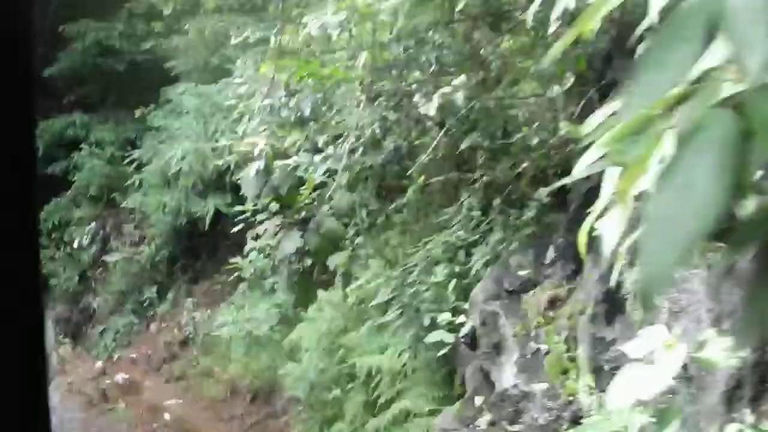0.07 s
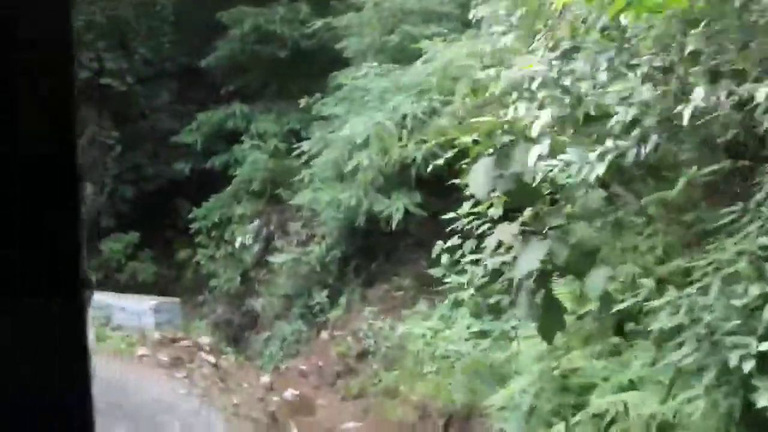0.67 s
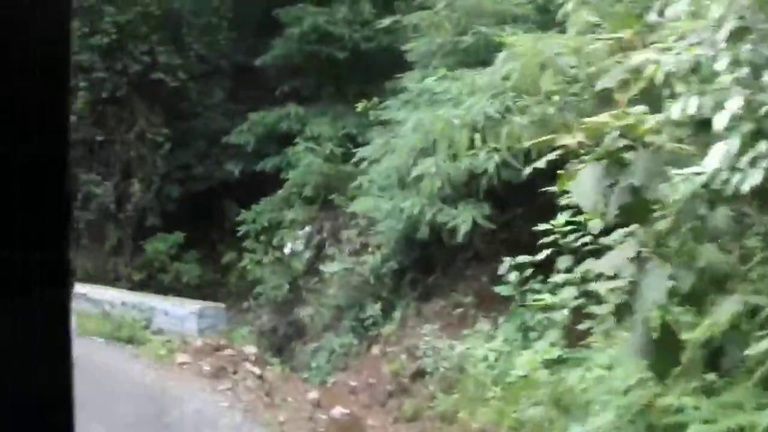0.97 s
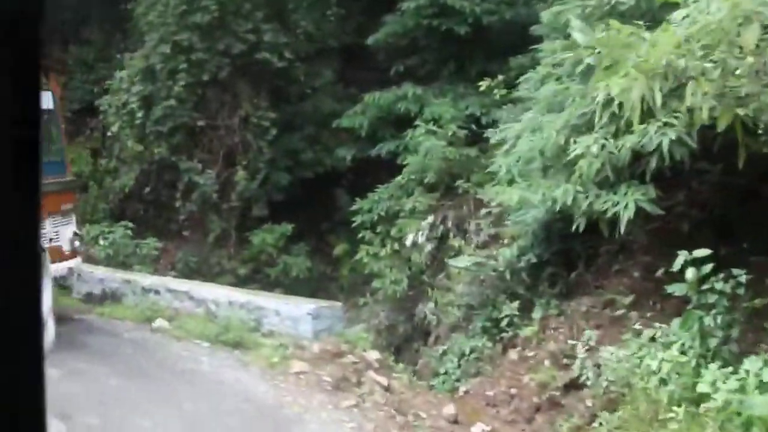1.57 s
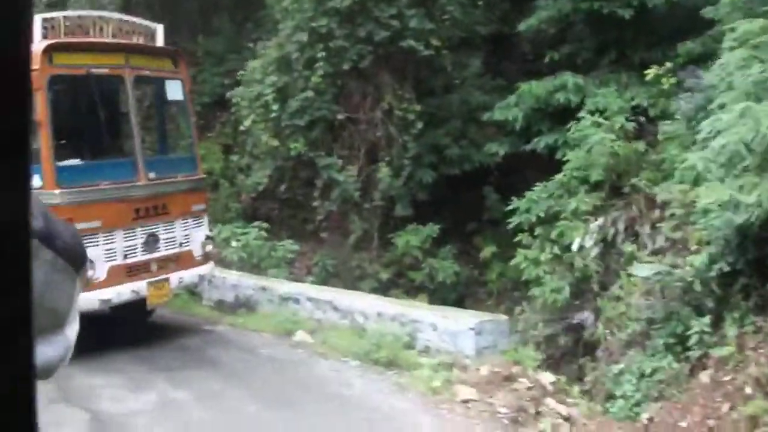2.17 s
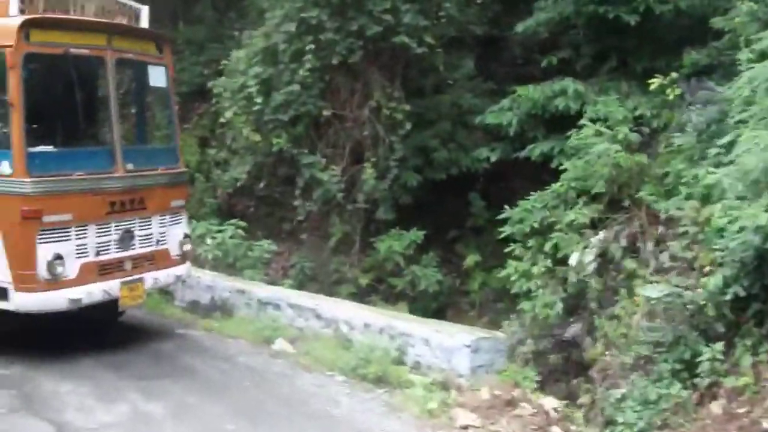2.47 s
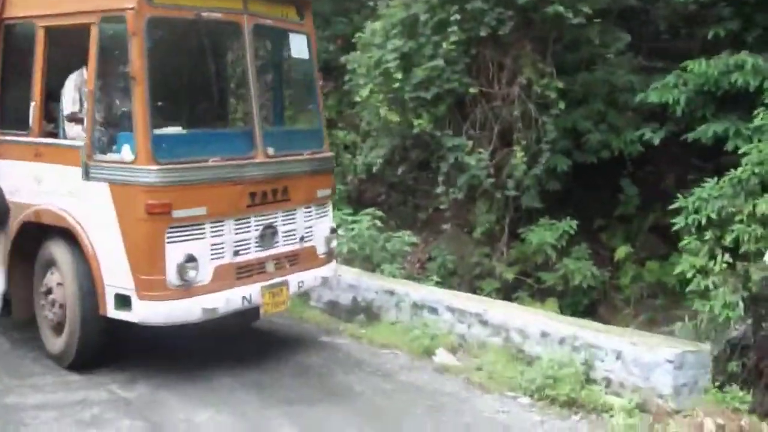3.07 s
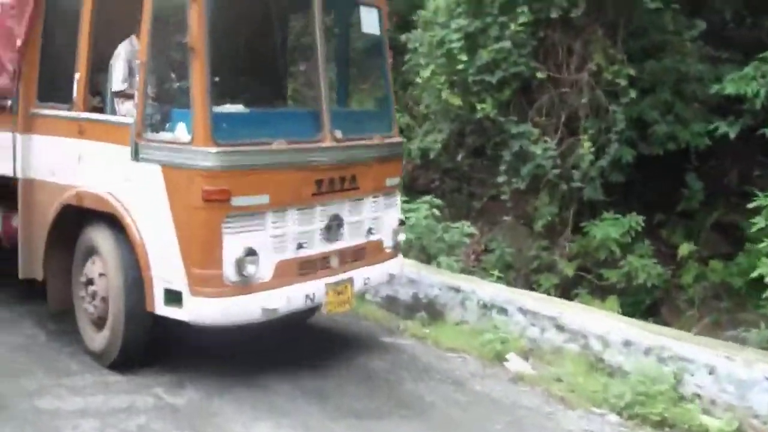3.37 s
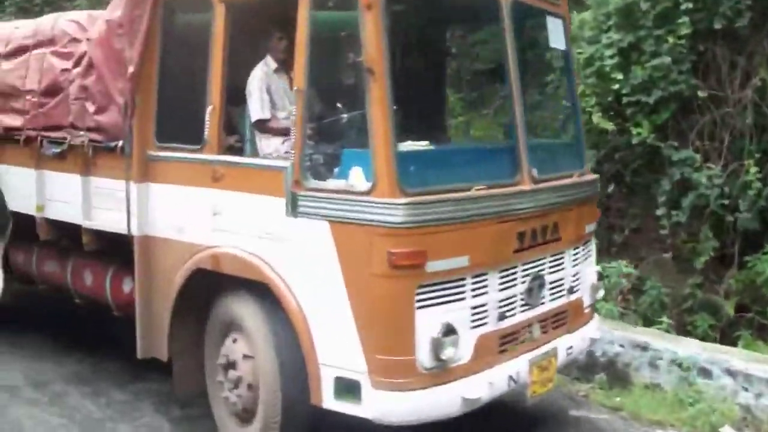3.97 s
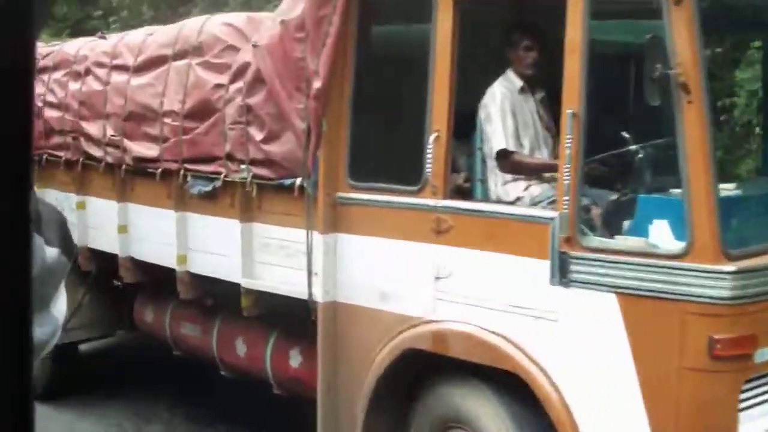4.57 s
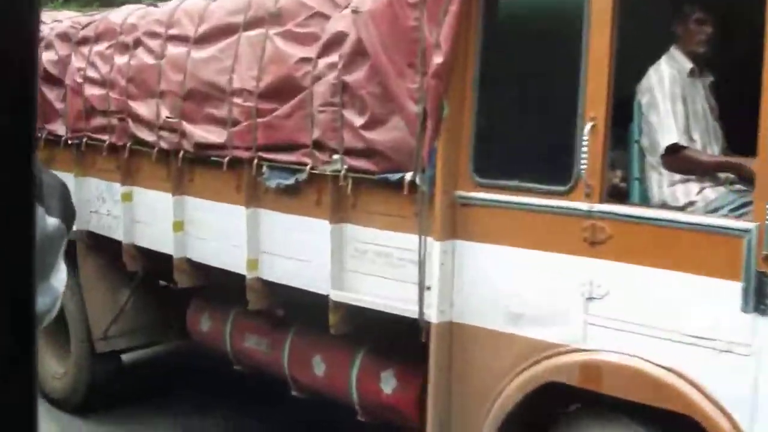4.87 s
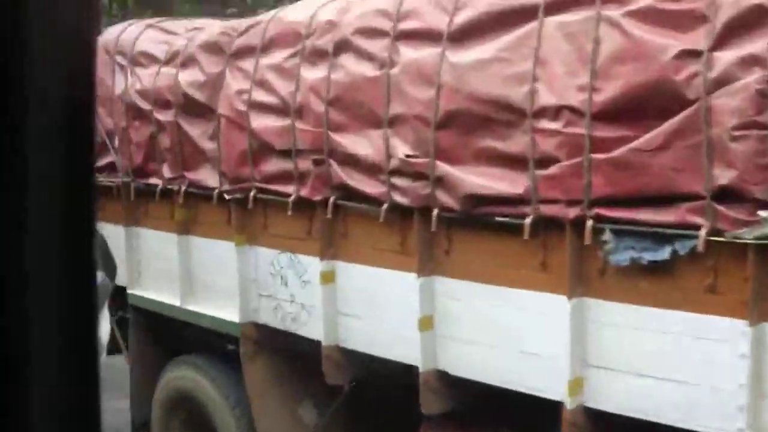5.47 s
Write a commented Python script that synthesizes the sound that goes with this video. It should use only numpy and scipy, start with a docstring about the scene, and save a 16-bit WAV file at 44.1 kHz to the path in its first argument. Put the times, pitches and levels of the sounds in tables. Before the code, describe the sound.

A diesel truck rumbles closer, brakes squeaking faintly, then gives a sharp air brake hiss, revs up and passes close by.

```python
"""A laden six-cylinder diesel truck creeps round a mountain bend and passes close to a waiting vehicle.
Heard from that vehicle's open window, each firing booms in the exhaust and clatters in the block,
over a low rumble and a growing hiss. Brake linings squeak, bodywork scuffs, a loose panel knocks
and a small plastic housing clicks close by. The air brake vents a jet that echoes off the hillside,
then the engine revs up and the truck goes by."""
import sys
import numpy as np
from scipy import signal
from scipy.fft import rfft, irfft
from scipy.io import wavfile
from scipy.ndimage import uniform_filter1d

SR = 44100
rng = np.random.default_rng(int(sys.argv[2]) if len(sys.argv) > 2 else 0)


def file_out(sig):
    """Save sig as 16-bit WAV at sys.argv[1]."""
    # one column per channel
    cols = np.atleast_2d(sig).T
    # limit, then scale
    lim = np.clip(cols, -1, 1)
    pcm = np.round(lim * 32767).astype(np.int16)
    wavfile.write(sys.argv[1], SR, pcm)


N = 242991
T = np.arange(N) / SR

# dabs of throttle: start_s, length_s, firing_from_hz, firing_to_hz, boom_db
THROTTLE_DABS = [(0.768, .35, 32.96, 49.97, -7.5), (3.828, .22, 43.88, 52.04, -18)]
# pulling away: time_s, firing_hz, boom_db
PULL_AWAY = [(4.45, 45.36, -14.5), (4.6, 58.46, -16.5), (4.612, 60.1, -12.5), (4.706, 67.5, -4),
             (4.866, 81.2, -7.5), (4.948, 85.7, -9), (5.074, 86.93, -13), (5.486, 76.65, -8.5),
             (5.51, 77.3, -12)]
# exhaust harmonics at the highest revs: crankshaft_multiple, gain_db
EXHAUST_ORDERS = [(1, -17), (2, -18), (3, 0), (4, -19), (5, -21), (6, -15.3), (7, -23), (9, -26), (11, -27),
                  (19, -30), (21, -27)]
# openings in the truck's side going by: centre_s, half_length_s, gain_db
SIDE_OPENINGS = [(3.448, 0.093, 1.5), (4.86, .11, 1), (5.45, .12, 2)]
# jolts of the waiting vehicle: centre_s, half_length_s, rush_db, sway_db
JOLTS = [(0.283, 0.16, -31, -28), (0.85, 0.17, -28.5, -23), (1.339, 0.076, -35.5, -12),
         (1.465, 0.08, -28, -17), (1.975, 0.094, -33.5, -17), (2.673, 0.096, -43, -18),
         (3.157, 0.033, -28, -24), (3.547, .14, -36, -18), (3.91, 0.062, -30, -29),
         (4.256, 0.09, -32, -18.5), (4.5, 0.069, -27, -14.5), (5.124, 0.04, -43, -9)]
# brake squeaks: start_s, length_s, start_pitch_hz, end_pitch_hz, level_db
SQUEAKS = [(-.03, .09, 8680, 8720, -40), (.14, .135, 3920, 4150, -35.5), (.2, .1, 8750, 8980, -45),
           (.57, .1, 10120, 10070, -43), (.62, .38, 5790, 5775, -38.5), (.715, .08, 11330, 11100, -49),
           (1.19, .09, 8720, 8680, -39)]
# bodywork scuffs: start_s, length_s, level_db
SCUFFS = [(0.157, 0.29, -35), (.565, 0.16, -32)]
# clicks on the housing: start_s, impulse_db
CLICKS = [(3.1265, -6.5), (3.1424, -12.5), (3.1722, 4.5)]

# spectral envelopes of the sources: frequency_hz, gain_db
BLOCK_SPECTRUM = [(110, -6), (170, 1.5), (220, -6), (310, -4.5), (410, -12.5), (520, -4.5), (650, -6),
                  (800, -7.5), (1100, -8.5), (2000, -17), (2950, -19.5), (3300, -37), (5400, -33.5),
                  (7150, -24.5), (10000, -40), (15000, -70)]
SHUDDER_SPECTRUM = [(12, -10), (20, -7), (28, -1), (36, -6.5), (48, -15.5), (70, -15.5), (100, -19),
                    (150, -28.5)]
BODY_SPECTRUM = [(60, -4), (110, -2), (170, 2.5), (230, 0), (310, -2), (400, -6.5), (520, -3), (800, -16),
                 (1200, -9.5), (1700, -23.5), (2200, -18.5), (5000, -41)]
RUSH_SPECTRUM = [(130, -4.5), (250, -2), (400, -1.5), (520, 2), (700, -9), (1000, -7.5), (1500, -14.5),
                 (2500, -22), (5000, -30)]
SWAY_SPECTRUM = [(14, -9), (28, 0), (38, -8), (55, -20)]
HISS_SPECTRUM = [(800, -6), (1500, -0.5), (2600, -3), (3500, -2), (4500, 0), (5400, -3.5), (6300, 0.5),
                 (7200, 2.5), (8000, -6), (9000, -8.5), (10200, -15.5), (12500, -17.5), (15000, -15)]
SCUFF_SPECTRUM = [(300, 5), (1000, -2), (2000, -11), (3600, -2), (5200, -14), (8000, -7), (11000, -27),
                  (14000, -36)]
JET_SPECTRUM = [(500, -8), (700, 5), (950, -2), (1400, 4), (1720, -9), (2050, 4.5), (2750, 0), (3020, -9),
                (3350, -0.5), (4400, 2), (5400, -4.5), (7150, -4.5), (8200, -11.5), (10000, -16),
                (13500, -21), (15500, -24)]
HOUSING_SPECTRUM = [(300, 0), (8800, 0), (11000, -12), (15000, -22)]
PIPE_FLOW_SPECTRUM = [(400, 6.5), (7000, -2), (9000, -11)]
SIZZLE_SPECTRUM = [(6000, -8), (7000, 6), (8500, -2.5), (11000, -6.5), (13500, -5), (15500, -14)]
STEREO_HISS_SPECTRUM = [(2500, -6), (7200, 0), (10000, -13), (15000, -24)]

# resonances of the ringing parts: pitch_hz, bandwidth_hz, gain_db
TRUCK_PANEL_MODES = [(526, 60, -1), (623, 74, 3), (688, 56, -4), (881, 58, -1), (1034, 88, -6.5),
                     (1254, 47, -11), (2902, 96, -10), (4050, 71, -25), (4460, 120, -25)]
ENGINE_FRONT_MODES = [(2900, 110, 0)]
LOOSE_PANEL_MODES = [(367, 60, 1), (720, 60, 6), (1070, 64, 1), (1490, 80, 0), (1950, 90, -8),
                     (3380, 430, -12)]
HOUSING_MODES = [(500, 160, 3), (1100, 600, -10), (2100, 700, -2), (4500, 1100, 3.5), (6400, 2200, 1),
                 (8200, 1500, 0)]
PIPE_MODES = [(676, 25, 2), (1360, 58, -6), (1416, 50, -8), (2330, 104, -14), (2710, 105, -5),
              (3300, 34, -6.5), (3975, 50, -4), (4140, 60, -13), (4440, 40, -6), (6950, 410, -11.5)]

IDLE_FIRING_HZ, IDLE_BOOM_DB = 43.27, -26.5


def undb(db):
    """Decibels to amplitude ratio."""
    return 10 ** (np.asarray(db) / 20)


def unit(x):
    """Normalise to rms 1."""
    return x / np.sqrt(np.mean(x ** 2))


def noise():
    """Gaussian white noise."""
    return rng.standard_normal(N)


def colour(x, spectrum):
    """Filter by a spectral envelope that rolls off beyond its ends; rms 1."""
    hz, db = np.transpose(spectrum)
    f = np.maximum(np.fft.rfftfreq(N, 1 / SR), 1)
    roll_off = np.minimum(f / hz[0], 1) ** 2 * np.minimum(hz[-1] / f, 1) ** 2
    return unit(irfft(rfft(x) * roll_off * undb(np.interp(np.log(f), np.log(hz), db)), N))


def ring(x, modes):
    """Forced response of damped resonators in parallel; rms 1."""
    f = np.maximum(np.fft.rfftfreq(N, 1 / SR), 1)
    response = sum(undb(db) / (1 + 1j * hz / width * (f / hz - hz / f)) for hz, width, db in modes)
    return unit(irfft(rfft(x) * response, N))


def wander(rate_hz):
    """Smooth random modulation; rms 1."""
    k = int(SR / rate_hz)
    return unit(uniform_filter1d(np.repeat(rng.standard_normal(N // k + 1), k), k)[:N])


def steady(x, span_s):
    """Dividing by the running rms evens out the swells of narrow-band noise."""
    k = int(span_s * SR)
    return x / np.sqrt(uniform_filter1d(uniform_filter1d(x ** 2, k), k))


def bell(centre_s, half_s):
    """Gaussian swell with peak 1."""
    return np.exp(-((T - centre_s) / half_s) ** 2)


def ease(u):
    """Raised-cosine step from 0 to 1."""
    return np.sin(np.pi / 2 * np.clip(u, 0, 1)) ** 2


def throttle():
    """The pedal governs firing rate and boom level: idle, two dabs, then the pull away."""
    attack_s, climb_s, release_s, fade_db_per_s, pull_attack_s = .03, .24, .09, 33, .06
    hz, db = IDLE_FIRING_HZ, IDLE_BOOM_DB
    for start_s, length_s, from_hz, to_hz, boom_db in THROTTLE_DABS:
        age = T - start_s
        pedal = ease(age / attack_s) * np.exp(-np.maximum(age - length_s, 0) / release_s)
        dab_hz = from_hz + (to_hz - from_hz) * ease(age / climb_s)
        hz = hz + pedal * (dab_hz - hz)
        db = db + pedal * (boom_db - fade_db_per_s * age - db)
    time_s, *columns = np.transpose(PULL_AWAY)
    pull_hz, pull_db = [np.interp(T, time_s, column) for column in columns]
    pedal = ease(1 + (T - time_s[0]) / pull_attack_s)
    return hz + pedal * (pull_hz - hz), db + pedal * (pull_db - db)


def exhaust(firing_hz, firings, boom_db):
    """Periodic gas pulses form a harmonic series on the crankshaft rate."""
    crank_phase = 2 * np.pi * firings / 3  # six cylinders fire three times a turn
    boom = 0
    for order, db in EXHAUST_ORDERS:
        # weaker harmonics waver more, and come through as the engine speeds up
        gain_db = db * np.sqrt(firing_hz.max() / firing_hz) + (.7 - db / 14) * wander(16)
        boom = boom + undb(gain_db) * np.sin(order * crank_phase + rng.uniform(0, 2 * np.pi))
    # the second firing harmonic fades in and drones on its own
    drone = undb(-35 + 2 * wander(6)) * np.sin(4 * np.pi * firings) * np.clip(T - 1, 0, 1)
    return np.sqrt(2) * (undb(boom_db) * boom + drone)


def clatter(firing_hz, firings):
    """Combustion impacts excite block and panels; spherical spreading makes them louder when near."""
    nearest_s, nearest_m, speed_m_s, rise_db_per_hz = 5.33, 3.16, 1.6, .2841
    distance_m = np.hypot(nearest_m, speed_m_s * (T - nearest_s))
    db = -18 + rise_db_per_hz * np.maximum(firing_hz - IDLE_FIRING_HZ, 0) - 20 * np.log10(distance_m)
    db += sum(gain_db * bell(s, half_s) for s, half_s, gain_db in SIDE_OPENINGS)
    # each firing has its own strength and decays towards a steady floor
    strength = undb(.66 * rng.standard_normal(1000))[firings.astype(int)]
    impacts = strength * (1.4 + np.exp(-(firings % 1) / .36))
    panels = colour(ring(impacts * noise(), TRUCK_PANEL_MODES), [(400, 0), (4500, 0)])
    block = colour(impacts * noise(), BLOCK_SPECTRUM)
    # the front of the engine rings as it goes by under load
    front = undb(-35) * bell(4.73, half_s=.23) * ring(impacts * noise(), ENGINE_FRONT_MODES)
    return undb(db) * (undb(-2.5) * block + undb(-5) * steady(panels, span_s=.084)) + front


def engine():
    """Phase is the integral of frequency: one slightly uneven firing count drives boom and clatter."""
    firing_hz, boom_db = throttle()
    firings = np.cumsum(firing_hz * (1 + .008 * wander(25))) / SR
    return exhaust(firing_hz, firings, boom_db) + clatter(firing_hz, firings)


def rumble():
    """Structural vibration: the waiting vehicle shudders and drums; jolts add a sway and a dull rush."""
    shudder = steady(colour(noise(), SHUDDER_SPECTRUM), span_s=.041) * undb(-21 + 1.06 * wander(4.73))
    body = steady(colour(noise(), BODY_SPECTRUM), span_s=.096) * undb(-33.5 + .32 * T)
    rush = sum(undb(db) * bell(s, half_s) for s, half_s, db, _ in JOLTS)
    rush *= colour(noise(), RUSH_SPECTRUM)
    sway = sum(undb(db) * bell(s, half_s) for s, half_s, _, db in JOLTS)
    sway *= steady(colour(noise(), SWAY_SPECTRUM), span_s=.044)
    panel_hum = undb(-22) * bell(.22, half_s=.06) * np.sin(2 * np.pi * 102 * T)  # under the first jolt
    return shudder + body + rush + sway + panel_hum


def hiss():
    """Broadband noise grows as the truck nears and swells as the cab goes by."""
    start_db, rise_db_per_s = -39, 1.2346
    cab_db = 4 * bell(4.8, half_s=.35)
    db = start_db + rise_db_per_s * T + cab_db + .61 * wander(7.4)
    return undb(db) * colour(noise(), HISS_SPECTRUM)


def brake_squeaks():
    """Friction-induced vibration: the linings sing in short, thin, trembling notes."""
    waver, flutter = 1 + .004 * wander(250), undb(3.3 * wander(70))
    notes = np.zeros(N)
    for start_s, length_s, start_hz, end_hz, db in SQUEAKS:
        progress = np.clip((T - start_s) / length_s, 0, 1)
        hz = (start_hz + (end_hz - start_hz) * progress) * waver
        arch = 2 * np.sqrt(progress * (1 - progress))
        notes += undb(db) * arch * np.sin(2 * np.pi * np.cumsum(hz) / SR)
    return hillside(notes * flutter, wet_db=-10, t60_s=.5)


def hillside(x, wet_db, t60_s):
    """Diffuse scattering from rock face and foliage adds a bright, exponentially decaying tail."""
    t = T[:SR]
    tail = rng.standard_normal(SR) * undb(-60 * t / t60_s) * np.clip(t / .028, 0, 1)
    return x + undb(wet_db) * signal.fftconvolve(x, tail / np.linalg.norm(tail))[:N]


def scuffs():
    """Friction noise: soft scuffs of the bodywork rise quickly and fade more slowly."""
    envelope = sum(undb(db) * np.interp(T, [s, s + length_s / 8, s + length_s], [0, 1, 0])
                   for s, length_s, db in SCUFFS)
    return envelope * undb(2 * wander(88.6)) * colour(noise(), SCUFF_SPECTRUM)


def panel_knock():
    """Damped vibration: a loose panel, jarred once, rattles briefly in its modes."""
    start_s, attack_s, decay_s = .563, .005, .056
    age = np.maximum(T - start_s, 0)
    return undb(-27) * ease(age / attack_s) * np.exp(-age / decay_s) * ring(noise(), LOOSE_PANEL_MODES)


def clicks():
    """Impulse response: each click is three ever weaker contacts that ring a small plastic housing."""
    gap_s, step_db = .00041, -3.5
    contacts = sum(undb(db + k * step_db) * signal.unit_impulse(N, int((s + k * gap_s) * SR))
                   for s, db in CLICKS for k in range(3))
    housing = colour(ring(contacts, HOUSING_MODES), HOUSING_SPECTRUM)
    return housing * np.sqrt(np.mean(contacts ** 2))


def air_brake():
    """A turbulent jet bursts from the valve, excites the pipe's modes and dies with the pressure."""
    start_s, attack_s, hold_s, fade_db_per_s = 4.107, .015, .062, 99
    age = np.maximum(T - start_s, 0)
    opening = 1 - np.exp(-age / attack_s)
    db = -16 - fade_db_per_s * np.maximum(age - hold_s, 0)
    jet = undb(-3.2) * colour(noise(), JET_SPECTRUM)
    pipe = undb(-.9) * steady(ring(colour(noise(), PIPE_FLOW_SPECTRUM), PIPE_MODES), span_s=.046)
    # as the pressure falls, a thin sizzle outlasts the roar
    sizzle = undb(-19.5 + .37 * db) * opening * colour(noise(), SIZZLE_SPECTRUM)
    roar = opening * undb(db + .52 * wander(70)) * (jet + pipe)
    return hillside(roar, wet_db=-7.5, t60_s=1.3) + sizzle


def scene():
    """The sources superpose, a sample later on the left; a faint treble hiss differs left and right."""
    pressure = engine() + rumble() + air_brake() + brake_squeaks()
    pressure += panel_knock() + scuffs() + clicks() + hiss()
    stereo_hiss = undb(-44.5) * np.array([colour(noise(), STEREO_HISS_SPECTRUM) for _ in range(2)])
    return np.array([np.append(0, pressure[:-1]), pressure]) + stereo_hiss


def record(dry):
    """Mid-side filtering keeps the bass mono; a faint whine joins, peaks clip and the top is cut."""
    whine_hz, mono_below_hz, top_hz = 14883, 750, 15300
    whine = undb(-60) * np.sin(2 * np.pi * np.cumsum(whine_hz + 7 * wander(60)) / SR)
    mid = (dry[0] + dry[1]) / 2 + whine
    high_pass = signal.butter(1, mono_below_hz, "high", fs=SR, output="sos")
    side = signal.sosfiltfilt(high_pass, (dry[0] - dry[1]) / 2)
    low_pass = signal.ellip(8, .1, 70, top_hz, fs=SR, output="sos")
    return signal.sosfilt(low_pass, np.clip([mid + side, mid - side], -1, 1))


dry = scene()
out = record(dry)
file_out(out)
```